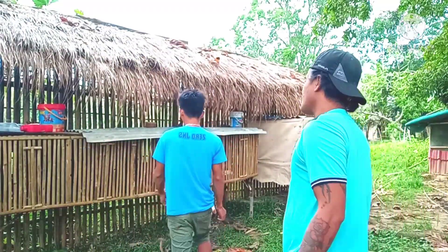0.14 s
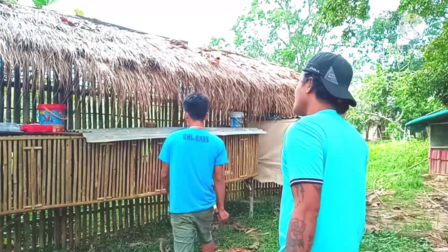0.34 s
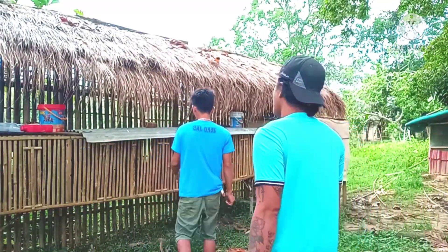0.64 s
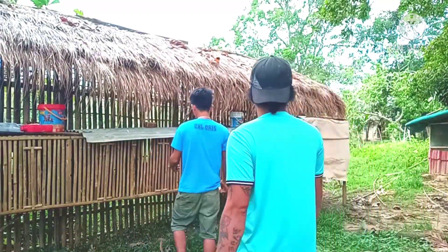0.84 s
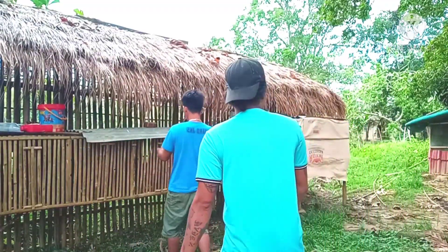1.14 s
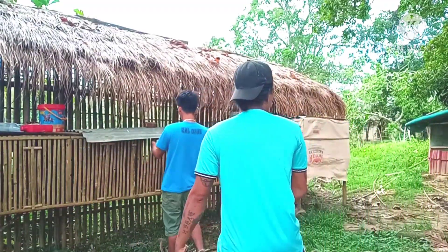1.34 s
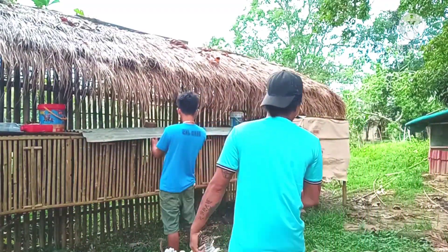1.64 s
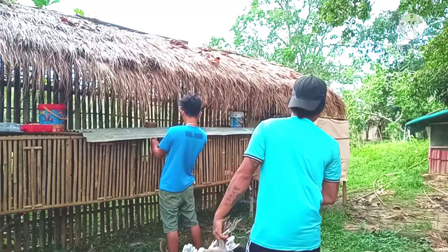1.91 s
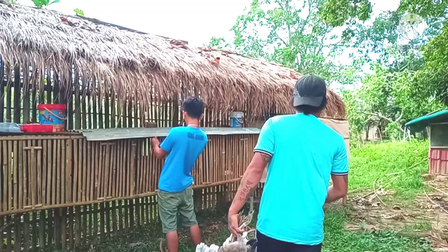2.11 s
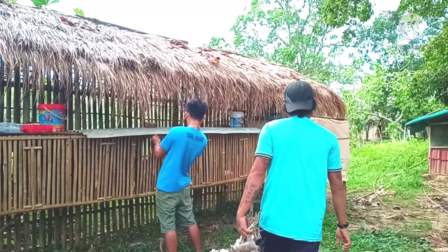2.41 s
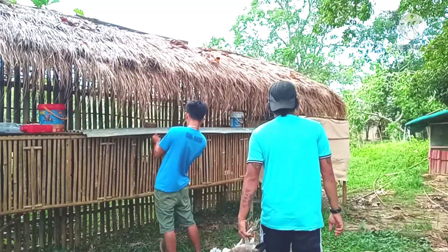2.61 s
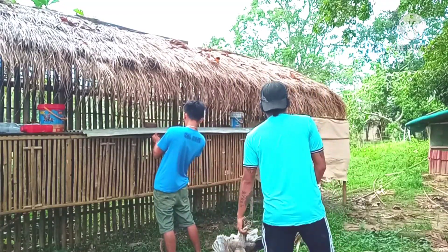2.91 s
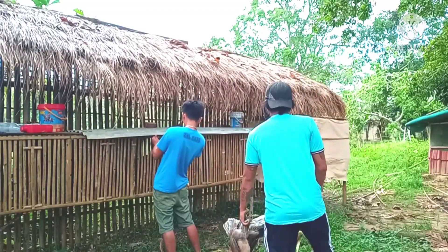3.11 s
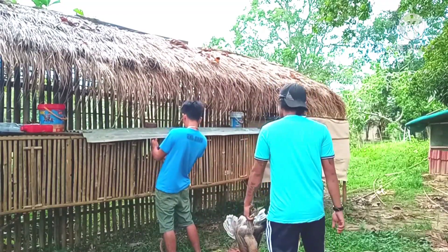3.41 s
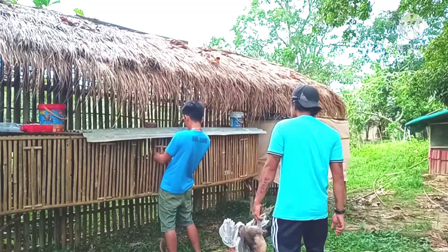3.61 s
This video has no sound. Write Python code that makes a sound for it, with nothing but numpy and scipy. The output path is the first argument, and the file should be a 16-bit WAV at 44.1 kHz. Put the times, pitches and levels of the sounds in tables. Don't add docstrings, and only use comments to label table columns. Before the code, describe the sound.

A songbird repeats a quick two-note chirp outdoors while hens cluck, chicks peep and a board knocks.

```python
import sys
import numpy as np
from scipy import signal
from scipy.fft import rfft, irfft, next_fast_len
from scipy.io import wavfile
from scipy.ndimage import uniform_filter1d, map_coordinates

SR = 44100
rng = np.random.default_rng(int(sys.argv[2]) if len(sys.argv) > 2 else 0)


def rack_gain(trim_db):
    fader = np.asarray(trim_db, float)
    return 10 ** (fader / 20)


def generate_wav(sig):
    pcm = np.round(np.clip(np.atleast_2d(sig).T, -1, 1) * 32767).astype(np.int16)
    wavfile.write(sys.argv[1], SR, pcm)


N = 165375

# start_s, first_note_db, second_note_db
SONG_PHRASES = [(1.342, -38.5, -47), (1.485, -33.5, -31), (1.631, -30.5, -31), (1.769, -27, -30),
                (1.909, -26.5, -33), (2.049, -31, -29), (2.186, -27.5, -29), (2.325, -30.5, -32),
                (2.475, -37.5, -31), (2.619, -35.5, -33.5), (2.80, -37, -38), (2.953, -39.5, -39.5)]
# start_s, length_s, from_hz, to_hz, level_db
HEN_CLUCKS = [(.045, 0.054, 570, 510, -47.5), (.652, 0.032, 469, 440, -49.5),
              (.762, 0.038, 463, 440, -48.5), (.983, 0.042, 433, 416, -36.5),
              (1.02, 0.048, 451, 420, -47.5), (1.16, 0.035, 476, 495, -43), (1.295, 0.053, 441, 421, -43),
              (1.35, 0.09, 409.5, 425, -48.5), (1.118, 0.051, 606, 563, -40.5),
              (1.185, 0.13, 525, 484, -48.5), (1.442, 0.054, 420, 383, -40),
              (1.615, 0.055, 418.5, 418, -41), (2.122, 0.052, 583.7, 545, -34),
              (2.471, 0.047, 557.6, 535, -34), (2.555, 0.058, 408, 387, -41),
              (2.938, 0.0506, 604.7, 490, -29.5), (3.31, 0.094, 421, 414, -50)]
# start_s, length_s, from_hz, to_hz, level_db
HEN_SQUAWKS = [(.93, 0.086, 742, 779, -47.5), (1.215, 0.062, 1050, 1060, -49),
               (2.515, 0.12, 1063, 1005, -39.5), (3.11, 0.084, 916, 813, -46.5),
               (3.225, 0.1, 1004, 1016, -48), (3.43, .13, 927, 870, -50.5), (3.59, 0.098, 979, 970, -52.5)]
# freq_hz, gain_db
THROAT_COLOUR = [(420, -7), (560, 1.5), (850, -5), (1220, 7), (1600, -9), (1780, -2.5), (2600, -21),
                 (6000, -40)]
# freq_hz, gain_db
BEAK_COLOUR = [(700, -2), (1050, -5), (2100, 3), (3140, -24), (6000, -56)]
# start_s, length_s, from_hz, to_hz, level_db
CHICK_PEEPS = [(0.479, 0.096, 3760, 3420, -49.5), (0.568, 0.065, 3480, 3050, -42.5),
               (0.77, 0.12, 4050, 2400, -41.5), (1.533, .14, 4020, 2946, -39),
               (2.246, 0.12, 3950, 2600, -40.5), (3.35, 0.0537, 3200, 2850, -43),
               (3.54, 0.051, 2230, 2090, -40.5), (3.596, 0.075, 2080, 1820, -44.5),
               (2.81, 0.071, 3530, 3100, -43.5), (1.123, .012, 2700, 3330, -47.5),
               (1.253, 0.015, 2450, 3300, -40.5), (1.1, 0.048, 3570, 3450, -44.5),
               (1.2, 0.075, 3100, 3300, -46), (1.5, 0.028, 2500, 2550, -40),
               (3.458, 0.032, 3130, 3080, -53), (3.9, 0.048, 3600, 3500, -49),
               (1.3, 0.032, 3500, 5900, -56.5), (2.483, .02, 3600, 2800, -39),
               (2.555, 0.057, 3200, 2800, -45), (2.48, 0.049, 2125, 2110, -47),
               (3.06, 0.041, 2850, 2600, -49)]
# time_s, pitch_hz, level_db
YOUNG_WHISTLE = [(1.295, 2250, -42), (1.315, 2300, -41.5), (1.35, 2180, -38), (1.41, 2100, -41),
                 (1.469, 2156, -39.5), (1.528, 2076, -40), (1.586, 1894, -39)]
# start_s, length_s, level_db, low_cut_hz, high_cut_hz
BOARD_SCRAPES = [
    (2.666, 0.135, -31.5, 81, 4060),
    (2.79, 0.079, -38.5, 145, 4800),
    (2.896, 0.051, -32.5, 980, 1030),
    (1.62, 0.061, -40, 390, 2140),
    (1.94, 0.11, -40.5, 490, 2700),
    (2.2, 0.15, -46.5, 230, 460),
    (3.306, 0.17, -43.5, 590, 3200),
    (1.13, 0.089, -49, 560, 750),
    (3.135, 0.069, -43.5, 730, 3500),
]
# start_s, peak_db
BOARD_SLIPS = [(2.666, -18.5), (2.675, -16), (2.68, -19), (2.695, -24), (2.7, -21), (2.709, -19),
               (2.723, -24), (2.735, -26), (2.744, -27), (2.755, -27), (2.774, -22), (2.784, -26)]
# freq_hz, density_db (per Hz)
BOARD_COLOUR = [(53, -37), (90, -8.5), (253, -3), (363, -6.5), (1070, -11), (1270, -3), (1460, -12),
                (5500, -19), (7150, -54), (12100, -120)]
# start_s, length_s, level_db
GRASS_RUSTLES = [(0.081, 0.3, -40), (0.98, 0.068, -51.5), (1.488, 0.2, -47), (1.901, 0.15, -41.5),
                 (1.997, 0.2, -42), (2.348, 0.085, -40.5), (2.898, 0.051, -37.5), (2.935, 0.08, -39.5)]
# start_s, peak_db
STALK_SNAPS = [(0.2324, -30), (1.0056, -26.5), (1.906, -25), (1.9235, -25), (2.034, -37), (2.901, -19.5)]
# freq_hz, density_db (per Hz)
GRASS_COLOUR = [(900, -14.5), (2000, -1), (5400, -4), (6300, -6), (7400, -3.5), (10500, -10), (13500, -14),
                (14900, -13)]
# start_s, length_s, level_db
WIND_PUFFS = [(0.431, 0.055, -40), (0.466, 0.043, -36), (0.58, 0.033, -25), (0.637, 0.036, -30.5),
              (0.669, 0.026, -34.5), (.715, 0.024, -35), (0.826, 0.028, -41.5), (0.904, 0.038, -39),
              (3.392, 0.014, -36.5), (3.413, 0.023, -30), (3.443, 0.057, -39.5), (3.473, 0.055, -41)]
# start_s, length_s, centre_hz, width_hz, level_db
FAR_CHATTER = [(.378, .085, 3750, 1100, -43), (.82, .08, 3500, 2000, -47), (1.225, .07, 3900, 500, -52),
               (1.348, .1, 2900, 900, -45), (3.085, .1, 5100, 700, -55), (3.3, .15, 5200, 700, -54),
               (3.315, .12, 3500, 900, -51), (3.56, .1, 5100, 700, -53)]
# time_s, level_db
YARD_LEVEL = [(0, -60), (.3, -61), (1.0, -57.5), (1.09, -65), (1.2, -60), (2.4, -58), (3.1, -57.5),
              (3.23, -63.5), (3.4, -58.5), (3.66, -60), (3.72, -69.5)]
# freq_hz, density_db (per Hz)
YARD_LOW_COLOUR = [(25, -28.5), (110, -4), (250, -18), (600, -21), (1100, -19), (3200, -19.5),
                   (5000, -29.5), (6500, -82)]
# freq_hz, density_db (per Hz)
YARD_HIGH_COLOUR = [(2650, -19), (4500, -16), (5420, -5), (6270, -17), (7130, -4.5), (8240, -15.5),
                    (10200, -1), (12000, -25), (15500, -21)]
# freq_hz, level_db (under the mid)
SIDE_LEVEL = [(40, -28), (90, -33), (300, -26), (1400, -28.5), (2800, -33.5), (5500, -27.5), (10000, -37.5),
              (14000, -26)]


def unit(x):
    return x / np.sqrt(np.mean(x ** 2) + 1e-20)


def along(points, hz):
    f, v = np.transpose(points)
    return np.interp(np.log(hz + 1), np.log(f + 1), v)


def wobble(rate, size=N):
    knots = rng.standard_normal(int(size / SR * 400) + 4)
    return map_coordinates(knots, [np.arange(size) * min(rate, 399) / SR])


def noise(size):
    return rng.standard_normal(size)


def filtered(x, response):
    m = next_fast_len(len(x) + 8192)
    return irfft(rfft(x, m) * response(np.fft.rfftfreq(m, 1 / SR)), m)[:len(x)]


def noise_band(size, centre_hz, width_hz):
    return unit(filtered(noise(size), lambda hz: 1 / (1 + ((hz - centre_hz) / (width_hz / 2)) ** 4)))


def add(track, s, x):
    part = track[round(s * SR):][:len(x)]
    part += x[:len(part)]


def shape(length_s, attack_s, release_s):
    t = np.arange(round(length_s * SR)) / SR
    ramp = np.minimum(t / attack_s, (length_s - t) / release_s)
    return t, np.sin(np.pi / 2 * np.clip(ramp, 0, 1)) ** 2


def tone(hz):
    return np.sqrt(2) * np.sin(2 * np.pi * np.cumsum(hz) / SR)


def room(x, t60):
    out, hop, t = np.zeros(N), 8820, np.arange(SR // 2) / SR
    for i in range(0, N, hop):
        tail = noise(len(t)) * rack_gain(-60 * t / t60) * (t > .006)
        add(out, i / SR, signal.fftconvolve(x[i:i + hop], tail / np.linalg.norm(tail)))
    return out


def grit(size, rate, spread_db):
    strength = rack_gain(spread_db * np.clip(noise(size), -2, 1.8))
    hits = (rng.random(size) < rate / SR) * strength
    return noise(size) * (1 + np.convolve(hits, np.exp(-np.arange(90) / 25))[:size])


def first_note(db):
    hold_s, fall_s, drop_s = 0.01305, 0.016, 0.0049
    drop_db, swell_db = -5.5, 2.5
    t, env = shape(hold_s + fall_s, 0.0031, 0.006)
    hz = np.interp(t, [0, hold_s, hold_s + drop_s, hold_s + fall_s], [3575, 3575 - 40, 2990, 2830])
    level_db = np.interp(t, [0, hold_s, hold_s + drop_s / 2, hold_s + drop_s],
                         [-swell_db, 0, drop_db + 7, drop_db])
    level_db = db + level_db + 0.48 * wobble(157, len(t))
    return rack_gain(level_db) * env * tone(hz * (1 + 0.008 * wobble(42, len(t))))


def flick(db):
    length_s = 0.0116
    t, env = shape(length_s, length_s / 3, length_s / 3)
    return rack_gain(db - 12) * env * tone(2700 + (2150 - 2700) * t / length_s)


def second_note(db):
    t, env = shape(.012, 0.0013, 0.0027)
    hz = 2597 + (2980 - 2597) * np.exp(-t / 0.0031)
    return rack_gain(db + 1.8 * wobble(190, len(t))) * env * tone(hz)


def songbird():
    flick_after_s, second_after_s = 0.033, .051
    song, direct = np.zeros(N), np.ones(N)
    for s, db, db2 in SONG_PHRASES:
        add(song, s, first_note(db))
        add(song, s + flick_after_s, flick(db))
        add(song, s + second_after_s, second_note(db2))
        for start, level_db in ((s, db), (s + second_after_s, db2)):
            direct[round(start * SR):] = rack_gain(0.55 * min(level_db + 30, 0))
    add(song, .028, rack_gain(-23) * song.copy())
    return direct * song + rack_gain(-3) * room(song, 0.65)


def voice(calls, tract, rough, jitter, uneven_db):
    out = np.zeros(N)
    for s, d, hz, to_hz, db in calls:
        t, env = shape(d, 0.012, 0.02)
        f = (hz + (to_hz - hz) * (t / d) ** 1.78) * (1 + jitter * wobble(62, len(t)))
        phase = 2 * np.pi * np.cumsum(f) / SR
        opening_db = db + 32.5

        def colour(x):
            return rack_gain(along(tract, x) + opening_db * (x > 1440))

        clear = np.zeros(len(t))
        for k in range(1, 9):
            clear += colour(k * f) * rack_gain(uneven_db * wobble(46.7, len(t))) * np.cos(k * phase)
        breath = filtered(noise(len(t)) * (1 + np.cos(phase)), lambda x: colour(x) * (x > 300))
        call = unit(clear) + rough * unit(breath)
        add(out, s, rack_gain(db + 1.8 * wobble(78, len(t))) * env * call)
    return out


def hens():
    clucks = voice(HEN_CLUCKS, THROAT_COLOUR, rough=0.28, jitter=0.02, uneven_db=2.2)
    squawks = voice(HEN_SQUAWKS, BEAK_COLOUR, rough=0.3, jitter=0.018, uneven_db=4)
    out = clucks + squawks
    return out + rack_gain(-6) * room(out, 0.084)


def chicks():
    out = np.zeros(N)
    for s, d, hz, to_hz, db in CHICK_PEEPS:
        t, env = shape(d, min(0.012, d / 3), min(0.026, d / 2))
        level_db = db + 3.86 * wobble(116.4, len(t))
        pitch = (hz + (to_hz - hz) * t / d) * (1 + 0.0099 * wobble(122.8, len(t)))
        add(out, s, rack_gain(level_db) * env * tone(pitch))
    s, hz, db = np.transpose(YOUNG_WHISTLE)
    t, env = shape(s[-1] - s[0], 0.012, 0.036)
    level_db = np.interp(t + s[0], s, db) + 2.3 * wobble(60.6, len(t))
    pitch = np.interp(t + s[0], s, hz) * (1 + 0.0075 * wobble(70, len(t)))
    add(out, s[0], rack_gain(level_db) * env * tone(pitch))
    return out + rack_gain(-4.5) * room(out, 0.26)


def board():
    out = np.zeros(N)
    for s, d, db, low_hz, high_hz in BOARD_SCRAPES:
        t, env = shape(d, 0.0023, d / 2)

        def body(hz):
            low_cut = 1 + (low_hz / (hz + 1)) ** 6
            high_cut = 1 + (hz / high_hz) ** 5
            return rack_gain(along(BOARD_COLOUR, hz)) / low_cut / high_cut

        x = unit(filtered(grit(len(t), 200, spread_db=2.0), body))
        add(out, s, rack_gain(db + 1.73 * wobble(46.2, len(t))) * env * x)
    return out + rack_gain(-6.5) * room(out, 0.28)


def slips():
    out, t = np.zeros(N), np.arange(600) / SR
    for s, db in BOARD_SLIPS:
        x = unit(filtered(noise(len(t)), lambda hz: rack_gain(along(BOARD_COLOUR, hz)) / (1 + (hz / 1800) ** 2)))
        add(out, s - .001, rack_gain(db - 10.5 - 60 * t / 0.034) * x)
    return out


def grass():
    out = np.zeros(N)
    for s, d, db in GRASS_RUSTLES:
        t, env = shape(d, d / 3, d / 2)
        x = filtered(grit(len(t), 340, spread_db=-6), lambda hz: rack_gain(along(GRASS_COLOUR, hz)))
        add(out, s, rack_gain(db + 2.1 * wobble(45.2, len(t))) * env * unit(x))
    t = np.arange(300) / SR
    for s, db in STALK_SNAPS:
        x = unit(filtered(noise(len(t)), lambda hz: rack_gain(along(GRASS_COLOUR, hz)) * (hz > 3000)))
        add(out, s - .0005, rack_gain(db - 14 - 60 * t / 0.027) * x)
    return out


def wind():
    out = np.zeros(N)
    for s, d, db in WIND_PUFFS:
        t, env = shape(d, d / 2, d / 2)
        hz = 103.5 * (1.25 - 0.39 * t / d) * (1 + 0.15 * wobble(66, len(t)))
        add(out, s, rack_gain(db) * env * (tone(hz) + 0.14 * tone(1.87 * hz)))
    return out


def chatter():
    out = np.zeros(N)
    for s, d, centre_hz, width_hz, db in FAR_CHATTER:
        t, env = shape(d, d / 6, d / 2)
        x = noise_band(len(t), centre_hz, width_hz)
        add(out, s, rack_gain(db + 0.3 + 2.7 * wobble(62, len(t))) * env * x)
    return out + rack_gain(-7.5) * room(out, 0.33)


def yard():
    z = signal.stft(noise(N + 512), nperseg=512)[2]
    field = uniform_filter1d(uniform_filter1d(noise(z.shape), 5, 0), 10, 1)
    patchy = signal.istft(z * rack_gain(3.6 * unit(field)), nperseg=512)[1][:N]
    low = unit(filtered(patchy, lambda hz: rack_gain(along(YARD_LOW_COLOUR, hz)) * (hz > 170)))
    high = unit(filtered(patchy, lambda hz: rack_gain(along(YARD_HIGH_COLOUR, hz))))
    rumble = unit(filtered(noise(N), lambda hz: rack_gain(along(YARD_LOW_COLOUR, hz)) * (hz <= 170)))

    time_s, db = np.transpose(YARD_LEVEL)
    level_db = np.interp(np.arange(N) / SR, time_s, db)
    swing_db = level_db - level_db.mean()
    hum_db = -53.5 + 0.87 * swing_db + 3.0 * wobble(24.58) + 0.69 * wobble(4.7)
    near = rack_gain(level_db + 6.5 + 0.34 * wobble(10)) * low
    far = rack_gain(-53 + 0.63 * swing_db) * high
    rumble = rack_gain(-58.0 + 1.63 * wobble(21)) * rumble
    hum = rack_gain(hum_db) * noise_band(N, 1268, 108)
    insects = rack_gain(-55 + 0.38 * wobble(3.83)) * noise_band(N, 10300, 1410)
    return near + far + rumble + hum + insects


def scene():
    animals = songbird() + hens() + chicks() + chatter()
    mid = animals + board() + slips() + grass() + wind() + yard()
    side = filtered(mid * wobble(300), lambda hz: rack_gain(along(SIDE_LEVEL, hz)))
    return np.array([mid + side, mid - side])


def roll_off(x):
    return signal.sosfilt(signal.butter(12, 16610, fs=SR, output="sos"), x)


def record(dry):
    def microphone(hz):
        return (hz < 15570) / (1 + (45 / (hz + 1)) ** 3)

    mix = np.array([filtered(channel, microphone) for channel in dry])
    return roll_off(mix)


dry = scene()
out = record(dry)
generate_wav(out)
```